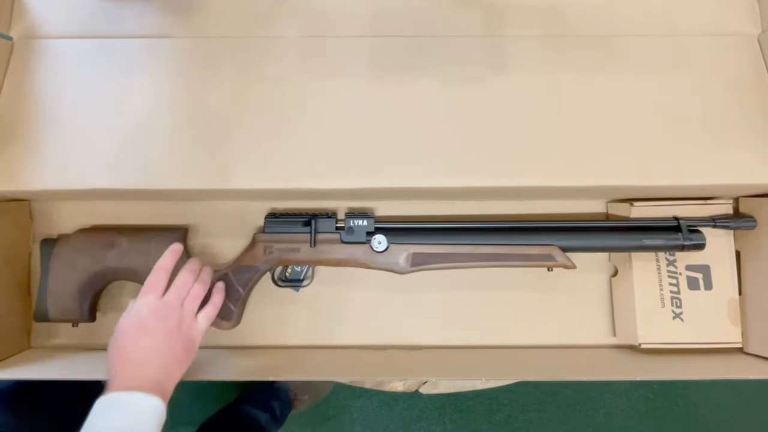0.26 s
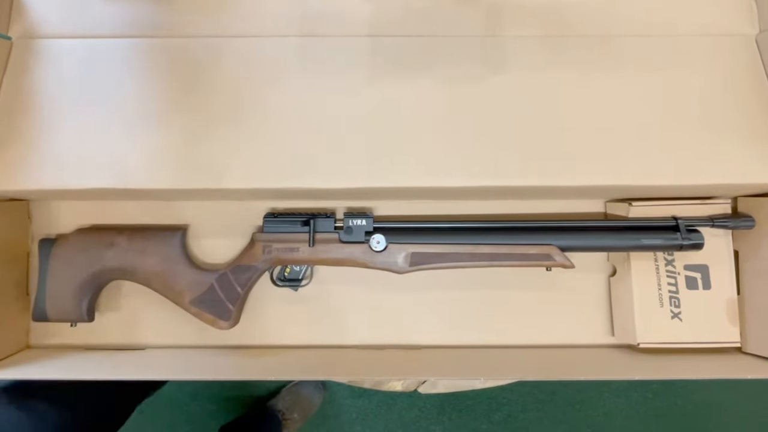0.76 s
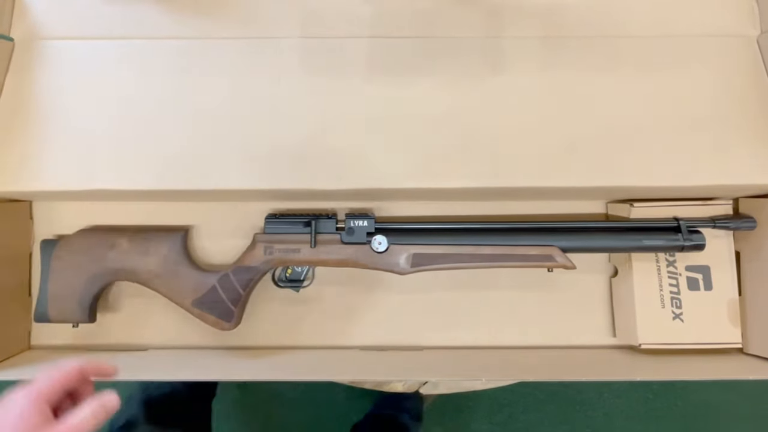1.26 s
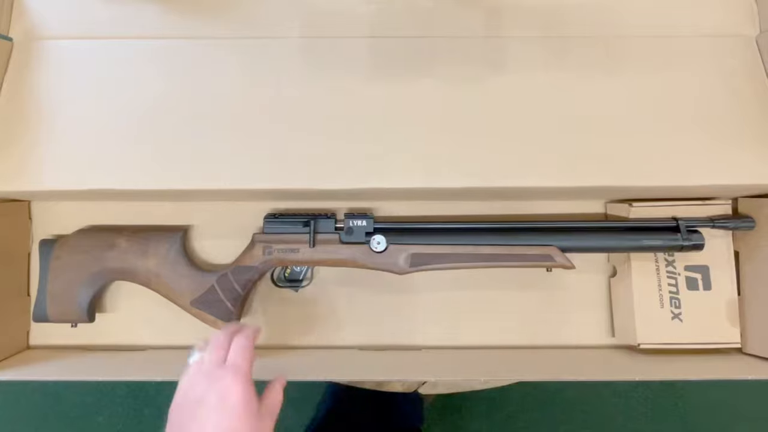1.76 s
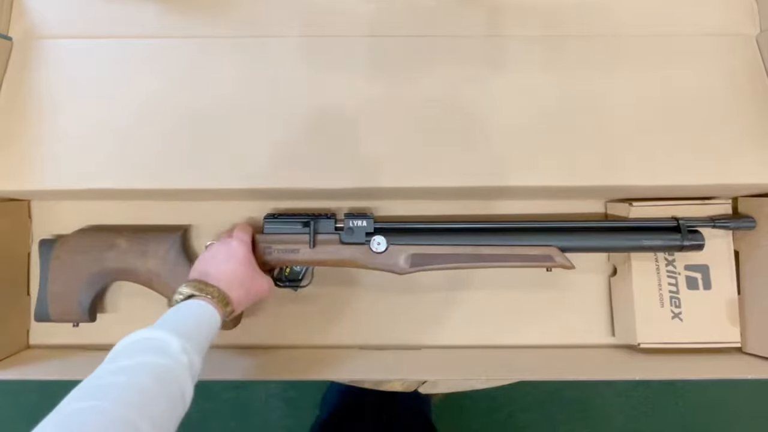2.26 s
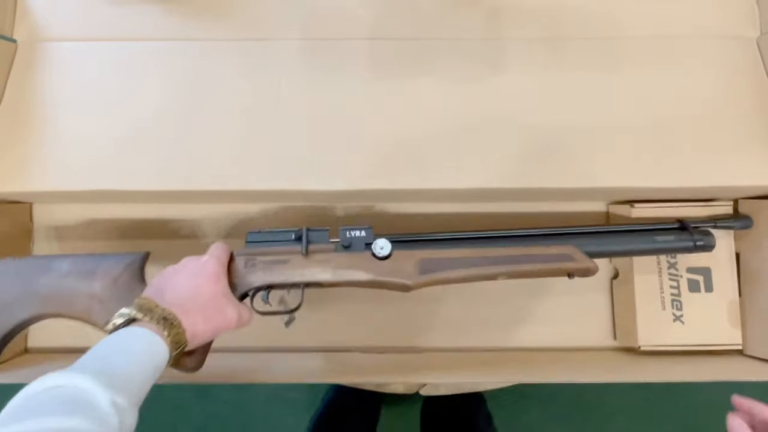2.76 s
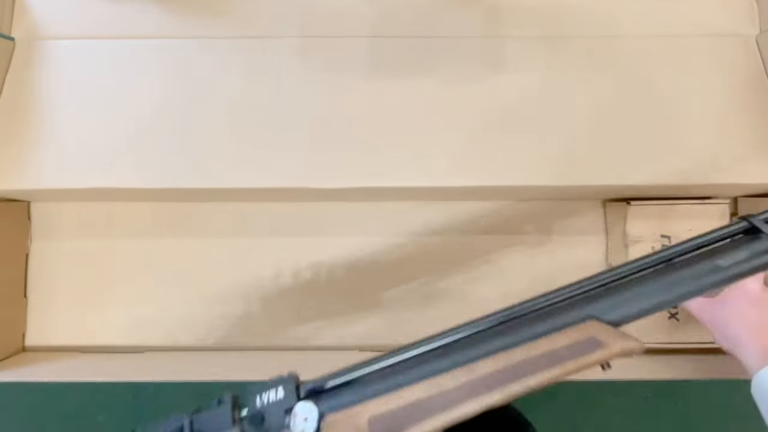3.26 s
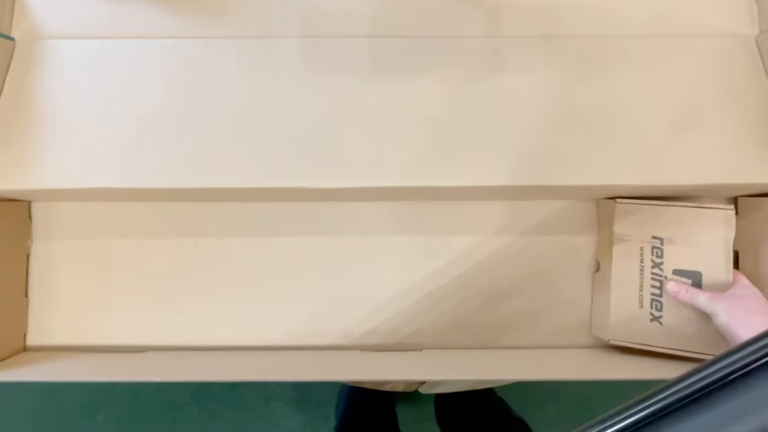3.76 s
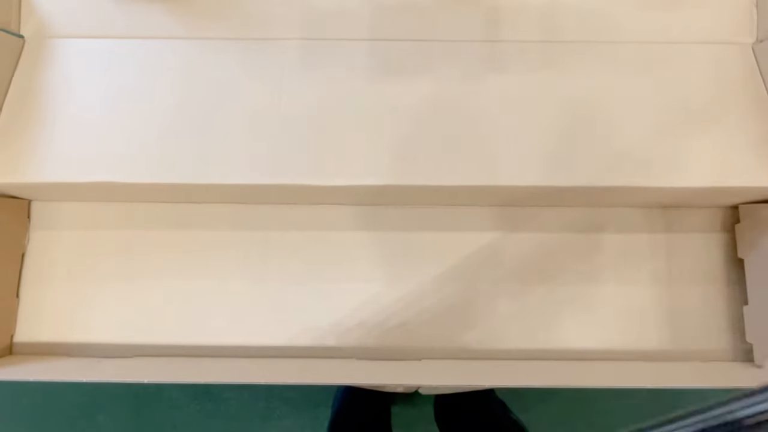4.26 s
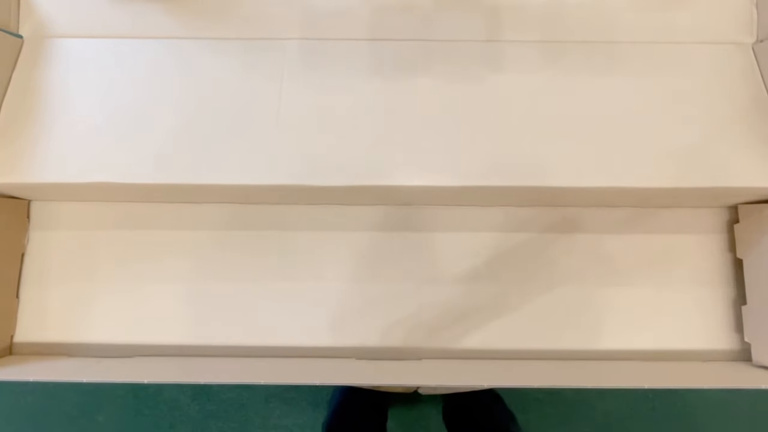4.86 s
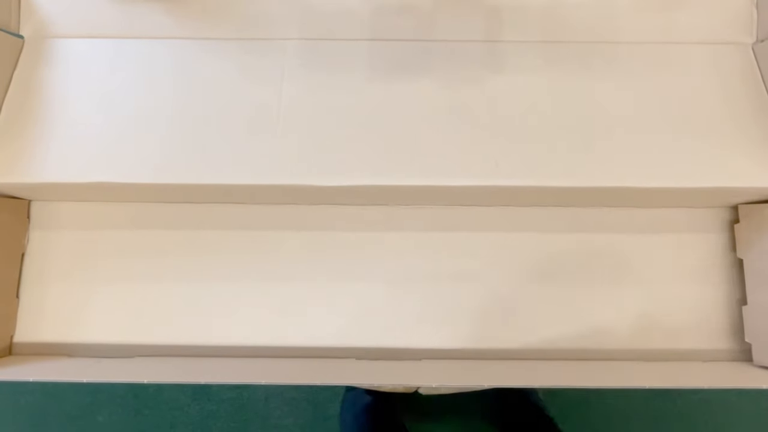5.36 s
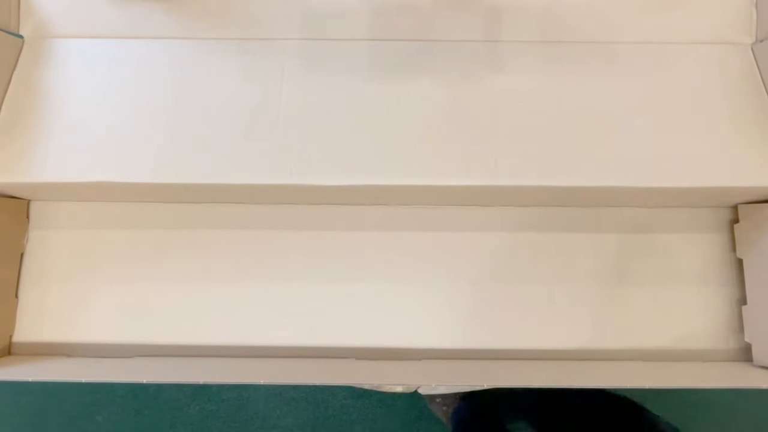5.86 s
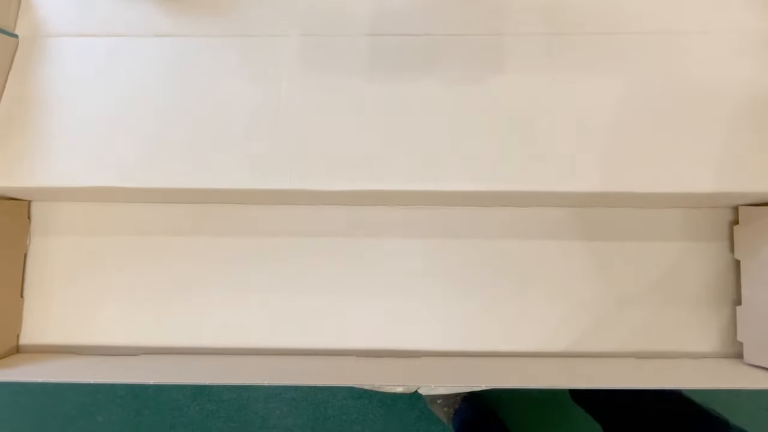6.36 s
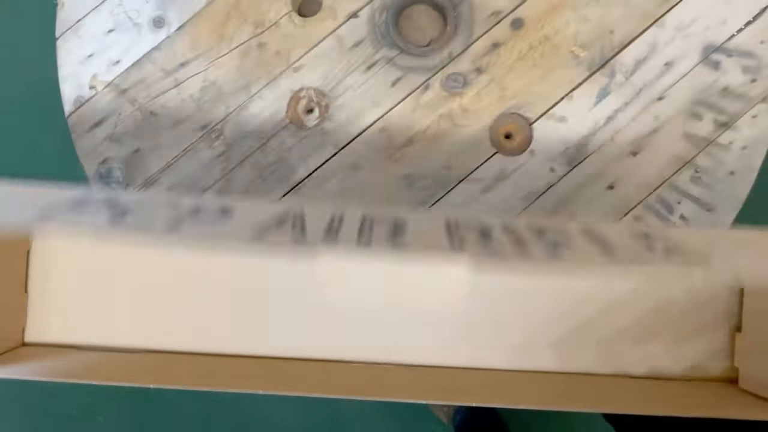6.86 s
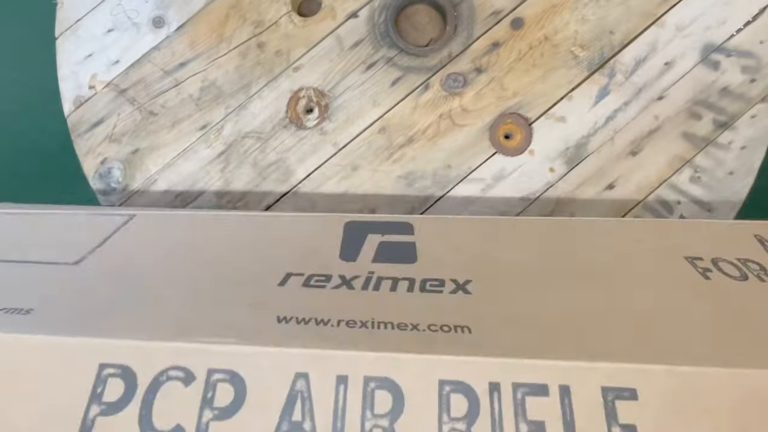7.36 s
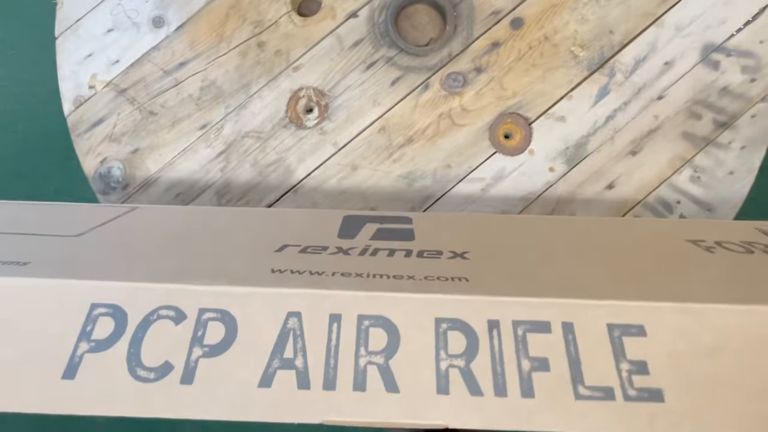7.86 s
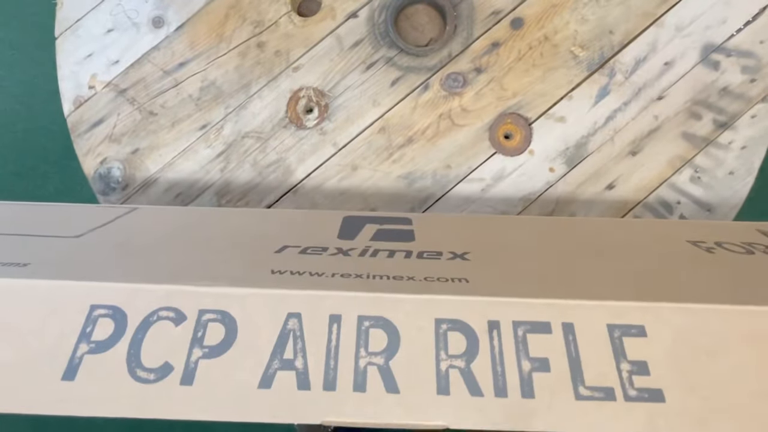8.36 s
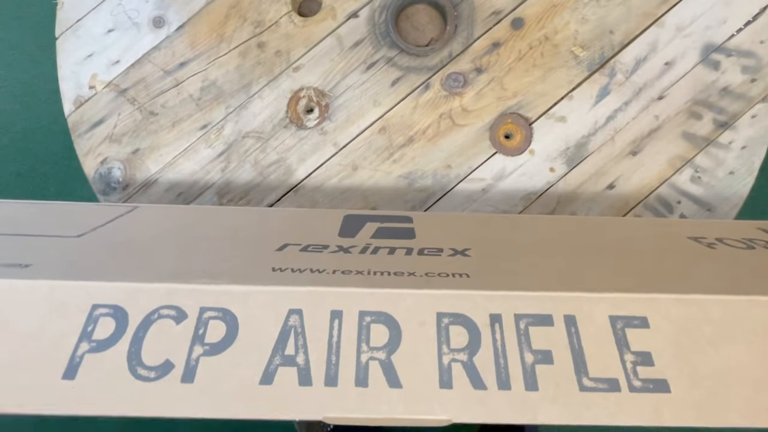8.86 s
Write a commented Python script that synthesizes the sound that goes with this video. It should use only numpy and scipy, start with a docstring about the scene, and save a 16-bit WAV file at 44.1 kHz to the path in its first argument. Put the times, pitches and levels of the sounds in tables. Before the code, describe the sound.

Inside a small quiet room, close wide stereo catches hands working in a cardboard box. Brief papery rubbing, a lull, then abrupt thuds and grainy slides as a long object and a small carton come out. Fibres crackle, creases tick, a tiny metal part clinks faintly beside the loudest hard knock. After a softer passage, the cardboard lid folds down with boxy thuds, low rumble and a final cluster of rattly knocks.

```python
"""Hands slide a long wooden object and a small carton out of a big cardboard box, then close and shift it.
Dragged surfaces are grainy noise: a hiss, drumming panels and, as the box shifts on its table, a rumble.
Blows thunk as a dead knock with ringing panel modes; hollow spots scuff in narrow bands of noise.
Creases tick, loose fibres crackle and a small metal part clinks once, over a quiet noise floor.
Two close microphone ports in a small room; the treble differs widely between left and right."""
import sys
import numpy as np
from scipy import signal
from scipy.fft import rfft, irfft
from scipy.io import wavfile
from scipy.ndimage import uniform_filter1d

SR = 44100
rng = np.random.default_rng(int(sys.argv[2]) if len(sys.argv) > 2 else 0)


def boost_factor(decibels):
    """Convert a level in decibels to a linear amplitude factor."""
    exponent = np.asarray(decibels, float) / 20
    return 10 ** exponent


def dump_mix(stems):
    """Bounce the given channels to the path in sys.argv[1] as a 16-bit WAV at rate SR."""
    frames = np.atleast_2d(stems).T  # one column per channel
    limited = np.clip(frames, -1, 1)  # hard clip at full scale
    pcm = np.round(limited * 32767).astype(np.int16)
    wavfile.write(sys.argv[1], SR, pcm)


N = 401751

# where the contact is: t/s, panel pitch f/Hz, surface pitch f/Hz, hollowness/dB (scaled per layer),
# left over right level/dB
CONTACT = [(0, 574, 2650, 1, -1.5), (.4, 780, 5470, 3, -6), (1.3, 330, 5450, 2.5, 6),
           (1.97, 368, 3300, 6.5, 5), (2.2, 352, 5050, -1, -1.5), (2.8, 865, 3070, 6.5, 0.5),
           (3.4, 321, 5670, -2.5, -1), (3.95, 328, 7500, 5.5, 0.5), (4.1, 1030, 2650, 7.5, 0),
           (4.5, 950, 3120, 5.5, 1.5), (4.9, 480, 6300, 4, 5), (5.2, 610, 2620, 0.5, 2.5),
           (5.55, 417, 2880, 3.5, 3), (5.75, 736, 5050, -0.5, 3.5), (6.3, 486, 4670, 2, -1),
           (8.1, 296, 1580, 1, 0), (8.3, 1400, 2170, 11, 5), (8.45, 226, 2520, 0.5, -0.5),
           (9.11, 408, 2940, 6, 0.5)]
# blows on the box: t/s of the peak, level/dB, f/Hz of the struck panel, contact/ms,
# ring level relative to the knock/dB
BLOWS = [(0.01, -26, 118, 13.5, -16), (0.0611, -32, 497, 3.9, -9), (2.0063, -52.5, 118, 10, -4),
         (2.1728, -28.5, 147, 7.1, 2.5), (2.2998, -30, 735, 1.34, -4), (2.341, -22, 288, 5.3, -15),
         (2.3525, -24, 116, 4.6, -26), (2.385, -39, 57.6, 12, -20), (2.3955, -33.5, 760, 3.8, -14),
         (2.4293, -36, 700, 2.7, 5), (3.198, -37, 334, 7.3, -41), (3.2766, -38.5, 717, 3.3, -12),
         (3.4032, -29.5, 360, 3.9, -7), (3.493, -38, 347, 6.2, -7), (3.5672, -39, 777, 3.4, 11),
         (3.6819, -28, 362, 4.7, -9), (3.7252, -17.5, 375, 7.3, -16), (3.75, -26.5, 228, 6.7, -13),
         (4.319, -31, 1030, 3, -70), (4.492, -38, 955, 1.7, -31), (4.8708, -30.5, 780, 1.7, -17),
         (4.909, -27.5, 280, 5.2, -35), (4.9837, -34.5, 570, 5.2, -9), (5.026, -32.5, 510, 4.9, -28),
         (5.139, -11.5, 667, 2.3, -34), (5.3303, -33, 505, 6.2, -33), (5.576, -45, 486, 2.1, -9),
         (6.003, -45.5, 113, 6.3, 2), (6.2151, -32, 101, 21, -16), (6.409, -30.5, 140, 14, 4),
         (6.4245, -27.5, 109, 11, -2), (6.45, -24.5, 560, 8.3, -11), (6.4582, -17, 142, 1.7, -17),
         (6.511, -25.5, 100, 6.6, -7), (6.9539, -30.5, 520, 5.1, -7), (6.9598, -25.5, 156, 4, -37),
         (6.976, -27.5, 130, 10, 1), (7.0316, -20, 186, 2.5, -6), (7.1411, -34, 378, 5.8, -19),
         (7.3175, -36.5, 132, 13, 5), (7.4381, -37, 490, 2.6, -7), (7.548, -20.5, 443, 3, -13),
         (7.5568, -18, 164, 5.8, -12), (7.7205, -35, 81, 16, -15), (7.795, -58, 60.5, 16, -23),
         (8.012, -41.5, 70, 7, -34), (8.3556, -36, 1340, 1.2, 21), (8.812, -36.5, 200, 2.7, -20),
         (8.83, -31.5, 740, 6.9, 13), (8.846, -28, 355, 6.5, -13), (8.864, -29, 96, 5.1, -17),
         (8.894, -33.5, 111, 6.3, -19), (8.962, -20, 405, 4.3, -10), (8.9988, -27, 594, 9.5, 10)]
# modes of the cardboard panels: f/Hz, level/dB, t60/s
PANELS = [(57, -11, 0.069), (88, -6, 0.37), (125, 2.5, 0.032), (151.5, 0, 0.11), (190, -10, 0.075),
          (240, 2, 0.097), (355, 6, 0.18), (480, 1.5, 0.19), (618, 6.5, 0.094), (732, 7, 0.094),
          (835, 7.5, 0.062), (1070, 10.5, 0.01), (1256, 5.5, 0.04), (1430, 15, 0.0063), (1737, 14, 0.024),
          (2393, -3, 0.033)]
PITCH_REF_HZ = 130  # blow pitch at which the table's shake and the struck panel have their stated level


def evened(x):
    """Scales to rms 1."""
    return x / np.sqrt(np.mean(x ** 2) + 1e-20)


def read(points, hz):
    """Reads a spectrum table on a log-frequency axis."""
    f, value = np.transpose(points)
    return np.interp(np.log(hz + 1), np.log(f + 1), value)


def column(rows, t, order):
    """Reads one column of a curve table at times t."""
    return np.interp(t, np.transpose(rows)[0], np.transpose(rows)[order])


def panned(x, pan_db):
    """Two channels, the left pan_db louder than the right."""
    return x * np.array([boost_factor(pan_db / 2), boost_factor(-pan_db / 2)]).reshape(2, -1)


def add(mix, s, sound):
    """Adds a sound at time s."""
    part = mix[:, max(round(s * SR), 0):][:, :sound.shape[1]]
    part += sound[:, :part.shape[1]]


def swells(t, s, swell_s, fade_s, level_db):
    """Gain of events, added in power, that rise to their level and fade by 20 dB per swell_s and fade_s."""
    coarse_t = t[::64]
    late = coarse_t - s[:, None]
    rising = -late / np.reshape(swell_s, (-1, 1))
    fading = late / np.reshape(fade_s, (-1, 1))
    lost_db = 20 * np.where(late < 0, rising, fading)
    power = (boost_factor(level_db[:, None] - lost_db) ** 2).sum(0)
    return np.interp(t, coarse_t, np.sqrt(power))


def friction(colour, size, grain_db, grain_s, patchy_db, pitch_hz, hollow_db, octaves, modes_db):
    """Noise in uneven slips, coloured by surface, panel modes, random patches and the hollow under the contact."""
    slips = np.minimum(rng.exponential(1, N // 32 + 2), 6)
    slips = uniform_filter1d(slips, max(round(grain_s * SR / 32), 1))
    slips = np.repeat((slips - slips.mean()) / slips.std(), 32)[:N]
    grains = boost_factor(grain_db * slips) * rng.standard_normal(N)
    hz, t, z = signal.stft(grains, SR, nperseg=size, noverlap=size * 3 // 4)
    # patches of random loudness, smoothed over 8 frames and 4 bins
    patches = uniform_filter1d(rng.standard_normal(z.shape[::-1]), 8, 0)
    patches = evened(uniform_filter1d(patches, 4, 1)).T
    at = np.minimum((t * SR).astype(int), N - 1)
    distance = np.log2((hz[:, None] + 1) / pitch_hz[at]) / octaves
    hollow = hollow_db[at] * np.exp(-distance ** 2)
    modes = sum(np.exp(-((hz - mode_hz) * t60 / 1.44) ** 2) for mode_hz, _, t60 in PANELS)
    field = boost_factor((read(colour, hz) + modes_db * modes)[:, None] + hollow)
    field /= np.sqrt((field ** 2).mean(0))
    z = z * field * boost_factor(patchy_db * patches)
    return evened(signal.istft(z, SR, nperseg=size, noverlap=size * 3 // 4)[1][:N])


def sliding():
    """Hiss, drumming and rumble of surfaces dragged over the board and shaken by the blows."""
    # colours of the three layers: f/Hz, level/dB
    hiss_colour = [(600, 3), (1300, 8), (2500, 5), (4300, 3.5), (6700, 2), (9000, -8.5), (12500, -14),
                   (15300, -16), (16500, -27)]
    drum_colour = [(120, -2), (260, 2), (700, -0.5), (1000, -4.5), (1600, -13), (3000, -36.5)]
    rumble_colour = [(20, -50), (38, 8.5), (60, 1.5), (95, -2), (200, -13.5), (330, -10), (600, -64)]
    # strokes of a hand or object over the board: t/s at full speed, swell/s, fade/s, hiss level/dB,
    # drumming level/dB
    strokes = [(.03, 0.81, 0.14, -54, -34.5), (.125, 0.51, 0.051, -49.5, -48.5),
               (0.247, 0.052, 0.46, -47, -53.5), (0.365, 0.25, 0.081, -45.5, -49.5),
               (0.502, 0.12, 0.22, -48.5, -52), (.63, 0.44, 0.19, -59.5, -63.5),
               (1.25, 0.065, 0.12, -66.5, -64), (1.357, 0.16, 0.069, -65.5, -61),
               (1.45, 0.48, 1, -75.5, -71.5), (2.167, 0.011, 0.086, -46.5, -40),
               (2.335, 0.096, 0.041, -46, -41.5), (2.399, 0.071, 0.087, -55, -41.5),
               (2.524, 0.065, 0.11, -60.5, -52), (2.804, 0.29, 0.14, -64, -56.5),
               (3.036, 0.033, 0.035, -65, -70), (3.129, 0.0058, 0.39, -65.5, -50.5),
               (3.288, 0.07, 0.17, -50, -47), (3.463, 0.022, 0.03, -54.5, -44.5),
               (3.522, 0.028, 0.041, -54, -49), (3.615, 0.062, 0.11, -49, -46.5),
               (3.732, 0.038, 0.043, -40.5, -32), (3.885, 0.22, 0.067, -44, -43.5),
               (3.99, 0.51, 0.22, -58.5, -52.5), (4.16, 0.17, 0.05, -53, -47),
               (4.312, 0.18, 0.097, -47, -50.5), (4.498, 0.11, 0.1, -56, -52),
               (4.664, 0.074, 0.027, -55, -54.5), (4.799, 0.032, 0.058, -45.5, -46.5),
               (4.899, 0.08, 0.074, -42.5, -52), (4.969, 0.1, 0.074, -46, -47),
               (5.05, 0.44, 0.42, -53, -55.5), (5.143, 0.053, 0.1, -46.5, -42),
               (5.272, 0.038, 0.1, -63, -52.5), (5.338, 0.056, 0.12, -58, -48),
               (5.478, 0.24, 0.09, -64, -52.5), (5.687, 0.044, 0.082, -56.5, -64),
               (5.817, 0.34, 0.28, -60, -53.5), (6.096, 0.21, 0.3, -60.5, -57),
               (6.19, 0.015, 0.06, -52, -43.5), (6.455, 0.13, 0.16, -46.5, -43),
               (6.705, 0.58, 0.2, -56, -47), (6.81, 0.06, 0.13, -62, -57.5),
               (6.954, 0.056, 0.42, -54.5, -51), (7.183, 0.086, 0.3, -61, -47),
               (7.438, 0.016, 0.47, -62, -51), (7.553, 0.067, 0.059, -52, -45.5),
               (7.663, 0.18, 0.037, -50, -55.5), (7.749, 0.19, 0.05, -59, -57),
               (8.061, 0.065, 0.21, -72.5, -65), (8.356, 0.22, 0.27, -57.5, -62),
               (8.47, 0.25, 0.3, -61.5, -55), (8.62, 0.66, 0.17, -63.5, -56),
               (8.838, 0.034, 0.16, -50.5, -36.5), (8.956, 0.011, 0.25, -55.5, -38.5)]
    # the box shifts its weight on the table: t/s, swell/s, fade/s, level/dB
    shifts = [(0, .1, 0.22, -28.5), (2.03, 0.066, 0.94, -61), (2.55, 0.73, 0.44, -49.5), (3.2, .07, 1, -59),
              (3.6, 0.35, 1, -48), (4.071, 0.14, 0.087, -42.5), (6.031, 0.11, 0.064, -53),
              (6.824, 0.057, 0.09, -39), (7.35, 0.75, 0.1, -44.5), (7.678, 0.68, 0.1, -38),
              (7.9, 0.16, 1, -55), (8.5, 0.15, 0.2, -57), (9.015, 0.15, 0.13, -35.5)]
    rest_db = -72.5  # the table never lies quite still
    # what each blow leaves behind: level under the blow's, onset and fade
    drum_after_db, drum_onset_s, drum_fade_s = -28.5, 0.005, 0.17
    shake_after_db, shake_onset_s, shake_fade_s = -20, 0.02, 0.16
    shake_db_per_octave = -9.5  # higher blows shake the table less

    t = np.arange(N) / SR
    panel_hz, surface_hz, hollow_db, pan_db = (column(CONTACT, t, order=k) for k in range(1, 5))
    hiss = friction(hiss_colour, size=256, grain_db=1.5, grain_s=0.004, patchy_db=2.3, pitch_hz=surface_hz,
                    hollow_db=1.1 * hollow_db, octaves=0.22, modes_db=0)
    drum = friction(drum_colour, size=1024, grain_db=1.6, grain_s=0.004, patchy_db=2, pitch_hz=panel_hz,
                    hollow_db=1.41 * hollow_db, octaves=0.32, modes_db=-0.5)
    rumble = friction(rumble_colour, size=2048, grain_db=3.5, grain_s=0.068, patchy_db=1.5, pitch_hz=panel_hz,
                      hollow_db=hollow_db, octaves=0.22, modes_db=5.0)

    s, swell_s, fade_s, hiss_db, drum_db = np.transpose(strokes)
    blow_s, blow_db, blow_hz = np.transpose(BLOWS)[:3]
    hiss_gain = swells(t, s, swell_s, fade_s, hiss_db)
    # louder strokes get more treble
    fizz = signal.sosfilt(signal.butter(4, 7500, "high", fs=SR, output="sos"), hiss)
    brightness = np.clip((20 * np.log10(hiss_gain + 1e-9) + 60) / 14, -0.5, 1.5)
    hiss = hiss + brightness * fizz

    stroke_drum = swells(t, s, swell_s, fade_s, drum_db)
    blow_drum = swells(t, blow_s + drum_onset_s, drum_onset_s, drum_fade_s, blow_db + drum_after_db)
    drum_gain = np.hypot(stroke_drum, blow_drum)

    shake_db = blow_db + shake_after_db + shake_db_per_octave * np.log2(blow_hz / PITCH_REF_HZ)
    shake = swells(t, blow_s + shake_onset_s, shake_onset_s, shake_fade_s, shake_db)
    weight = np.hypot(swells(t, *np.transpose(shifts)), shake)
    rumble_gain = np.hypot(weight, boost_factor(rest_db))
    # the rumble arrives alike at both ports
    return panned(hiss_gain * hiss + crackle(hiss_gain) + drum_gain * drum, pan_db) + rumble_gain * rumble


def crackle(hiss_gain):
    """Loose fibres snap under a stroke: sparse bursts of random size, each a few cycles of one of 8 pitches."""
    snaps_per_s, over_hiss_db = 90, 4
    size = boost_factor(5 * np.minimum(rng.exponential(1, N), 2.2))
    size = size * (rng.random(N) < snaps_per_s / SR)
    scrap = rng.integers(0, 8, N)
    t = np.arange(300) / SR
    out = np.zeros(N)
    for k, hz in enumerate(np.geomspace(800, 4800, num=8)):
        snap = np.sin(2 * np.pi * hz * t) * np.exp(-t * hz / 1.07)
        out += signal.oaconvolve(size * hiss_gain * (scrap == k), snap)[:N]
    return boost_factor(over_hiss_db) * out


def thunks():
    """Each blow is a short dead knock set by the contact time, plus a ring of the panel modes near its pitch."""
    struck_db, struck_db_per_octave = 5, -6  # big low panels boom clear, small ones rattle among neighbours
    sag = 0.08  # the struck pitch falls as 1 / (1 + sag * t / peak_s)
    out, t = np.zeros((2, N)), np.arange(SR // 3) / SR
    hz, db, t60 = np.transpose(PANELS)[:, :, None]
    chance = rng.standard_normal((len(BLOWS), 2, len(PANELS), 1))
    for (s, level_db, pitch_hz, contact_ms, ring_db), (spot, detune) in zip(BLOWS, chance):
        peak_s = contact_ms / 1000 * 0.75
        octaves = np.log2(hz / pitch_hz)
        near_db = np.where(octaves > 0, -12 * octaves, 9.6 * octaves)  # little reaches modes far from the pitch
        spot_db = 2.5 * spot  # the spot hit favours some modes
        phase = 2 * np.pi * hz * (1 + 0.049 * detune) * (t - peak_s) + 1.22 * spot
        waves = boost_factor(db + near_db + spot_db) * np.cos(phase)
        ring = (waves * boost_factor(-60 * t / t60)).sum(0) * (1 - np.exp(-(t / peak_s) ** 2))

        clear = boost_factor(struck_db + struck_db_per_octave * np.log2(pitch_hz / PITCH_REF_HZ))
        sagging = np.log((1 + sag * t / peak_s) / (1 + sag))
        struck = np.cos(2 * np.pi * pitch_hz * peak_s / sag * sagging)
        press = t / peak_s * np.exp(1 - t / peak_s)
        knock = (waves.sum(0) / abs(waves.sum(0)).max() + clear * struck) * press

        sound = knock / abs(knock).max() + boost_factor(ring_db) * ring / abs(ring).max()
        sound = boost_factor(level_db + 1.5) * sound / abs(sound).max()
        add(out, s - peak_s, panned(sound, column(CONTACT, s, order=4)))
    return out


def scuffs():
    """Short rubs: uneven noise in one resonance of a hollow, quick to start and stop, sinking in pitch."""
    # rubs over a hollow spot: start t/s, length/s, rms level/dB, centre f/Hz, width/Hz
    rubs = [(1.992, 0.073, -73.5, 3250, 750), (1.996, 0.17, -75, 5650, 900), (2.07, 0.097, -64, 2900, 750),
            (2.78, 0.068, -80, 850, 250), (3.133, 0.072, -54.5, 935, 300), (3.689, 0.023, -56, 3850, 600),
            (4.282, 0.042, -43, 934, 334), (4.477, 0.039, -53, 3530, 1100), (5.15, 0.041, -52, 647, 150),
            (5.23, 0.07, -49.5, 596, 150), (5.722, .11, -51, 771, 297), (5.731, 0.121, -52.5, 433.7, 200),
            (6.348, 0.019, -51, 756, 250), (6.363, 0.13, -60, 4430, 1600), (7.17, 0.021, -55.5, 2600, 1200),
            (7.435, 0.089, -61.5, 4050, 1590), (7.866, 0.028, -68, 1405, 695),
            (8.022, 0.019, -74, 1370, 500), (8.36, 0.19, -54.5, 158.4, 67), (8.425, 0.073, -54, 301, 80)]
    rise_s, fall_s = 0.0072, 0.0062  # the fall is 20 dB
    sag_hz = 89  # pitch that a rub loses as it slows
    out, t = np.zeros((2, N)), np.arange(SR // 4) / SR
    noises = rng.standard_normal((len(rubs), 3, len(t)))
    for (s, length_s, db, hz, width_hz), noise in zip(rubs, noises):
        lowpass = signal.butter(2, width_hz / 2, fs=SR, output="sos")
        band = signal.sosfilt(lowpass, noise[0] + 1j * noise[1])
        pitch_hz = hz + sag_hz * (0.5 - np.minimum(t / length_s, 1))
        carrier = np.exp(2j * np.pi * np.cumsum(pitch_hz) / SR)
        uneven = boost_factor(2.5 * evened(uniform_filter1d(noise[2], 250)))
        rub = evened(uneven * (band * carrier).real)
        shape = np.minimum(t / rise_s, 1) * boost_factor(-20 * np.maximum(t - length_s, 0) / fall_s)
        add(out, s, panned(boost_factor(db) * shape * rub, column(CONTACT, s, order=4)))
    return out


def ticks():
    """Millisecond cracks with a short puff, coloured by the damped scrap of board that gives way."""
    # sharp ticks of creases and edges: t/s, level/dB, centre f/Hz
    creases = [(0.035, -45, 2530), (2.159, -45, 1660), (2.333, -45, 2660), (3.5195, -50.5, 2000),
               (3.678, -45, 1270), (3.719, -37, 4470), (3.739, -37, 1610), (3.77, -38, 1300),
               (4.284, -44, 3200), (4.318, -42, 1630), (4.797, -32, 4500), (4.962, -40, 1900),
               (5.032, -40, 2150), (5.137, -38, 1990), (6.181, -49, 2030), (6.189, -41, 3180),
               (6.204, -42.5, 1150), (6.4463, -33, 3900), (6.497, -37.5, 4800), (8.32, -42, 2020),
               (8.343, -43.5, 4450), (8.357, -40, 2220), (8.8238, -44, 3340), (8.843, -43, 2200),
               (8.958, -50.5, 2380)]
    out, t = np.zeros((2, N)), np.arange(1500) / SR
    noises = rng.standard_normal((len(creases), 1500))
    for (s, level_db, centre_hz), noise in zip(creases, noises):
        crack = noise * (np.exp(-t / 0.0007) + 0.2 * np.exp(-t / 0.007))
        crack[0] = 3  # the first break
        scrap = signal.butter(2, [0.5 * centre_hz, 1.5 * centre_hz], "band", fs=SR, output="sos")
        burst = signal.sosfilt(np.vstack([scrap, scrap[:1]]), crack)
        burst = burst + 0.036 * crack  # a little unfiltered crack
        burst = boost_factor(level_db + 9.0) * burst / abs(burst).max()
        add(out, s, panned(burst, column(CONTACT, s, order=4)))
    return out


def clink():
    """A small metal part touches, rings in two close modes and is damped."""
    # modes of the metal part: f/Hz, level/dB, t60/s
    metal = [(4646, -44.5, 0.3), (4913, -45.5, 0.25)]
    start_s, rise_s, held_s, damped_s = 4.955, 0.005, 0.056, 0.0025
    out, t = np.zeros((2, N)), np.arange(SR // 4) / SR
    held = np.minimum(t / rise_s, 1) * np.exp(-np.maximum(t - held_s, 0) / damped_s)
    ring = sum(boost_factor(db - 60 * t / t60) * np.sin(2 * np.pi * hz * t) for hz, db, t60 in metal)
    add(out, start_s, (held * ring)[None])
    return out


def air():
    """The steady quiet floor: coloured noise of the room and the microphone."""
    # colour of the floor: f/Hz, level/dB
    floor_colour = [(38, -29), (62, -12.5), (110, -6), (450, -21.5), (1500, -29), (6000, -34),
                    (11000, -35.5), (16000, -45)]
    spectrum = rfft(rng.standard_normal(N)) * boost_factor(read(floor_colour, np.fft.rfftfreq(N, 1 / SR)))
    return boost_factor(-75) * evened(irfft(spectrum, N))


def room(x, start_s, t60_factor):
    """Reverberation as sparse taps of random sign, each band dying at its own speed."""
    # decay of the room, to be scaled by t60_factor: f/Hz, t60/s
    decay = [(100, 0.31), (500, 0.49), (2000, 0.28), (8000, 0.23)]
    taps = np.zeros(SR // 2)
    at = np.arange(round(start_s * SR), len(taps) - 20, 20)
    taps[at + rng.integers(0, 20, len(at))] = rng.choice([-1., 1.], len(at))
    hz, t, z = signal.stft(taps, SR, nperseg=256)
    t60 = (t60_factor * read(decay, hz))[:, None]
    tail = signal.istft(z * boost_factor(-60 * t / t60), SR, nperseg=256)[1]
    return signal.fftconvolve(x, tail / np.linalg.norm(tail))[:N]


def scene():
    """All sources and the room; the ports differ by part phase lead, part scatter from nearby surfaces."""
    # left-right difference over the sum: f/Hz, level/dB
    side_over_mid = [(60, -10), (250, -16.5), (500, -6), (800, -4), (2400, -2), (4400, -0.3), (6800, 0.5),
                     (8600, 6), (11000, 17.5), (13500, 10), (15500, 4)]
    lead = 0.45  # share of the difference that is a quarter-cycle lead
    left, right = sliding() + thunks() + ticks() + scuffs() + clink() + air()
    mid, lean = (left + right) / 2, (left - right) / 2
    mid = mid + boost_factor(-13.0) * room(mid, start_s=0.0057, t60_factor=0.55)

    ratio = boost_factor(read(side_over_mid, np.fft.rfftfreq(N, 1 / SR)))
    share = 1 / np.sqrt(1 + ratio ** 2 / 2)  # the sum gives way where the difference is strong
    # three scatter patterns take turns, one round in 0.21 s
    turn = 2 * np.pi * np.arange(N) / SR / 0.21
    scatter = sum(room(mid * np.cos(turn + k * 2 * np.pi / 3), start_s=0.0004, t60_factor=0.13)
                  for k in range(3))
    apart = lead * 1j * rfft(mid) + np.sqrt((1 - lead ** 2) * 2 / 3) * rfft(scatter)
    side = irfft((apart * ratio + rfft(lean)) * share, N)
    mid = irfft(rfft(mid) * share, N)
    return np.array([mid + side, mid - side])


def band_limit(x):
    """A steep low-pass at the top of the band."""
    return signal.sosfilt(signal.butter(12, 17080, fs=SR, output="sos"), x)


def record(dry):
    """The microphone's bass cut: a steep high-pass at 43 Hz."""
    cut = signal.sosfilt(signal.butter(4, 43, "high", fs=SR, output="sos"), dry)
    return band_limit(cut)


dry = scene()
out = record(dry)
dump_mix(out)
```